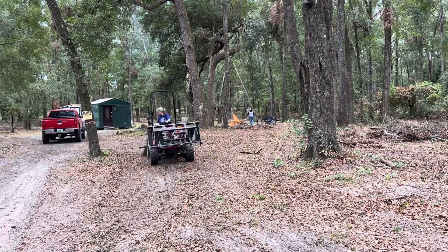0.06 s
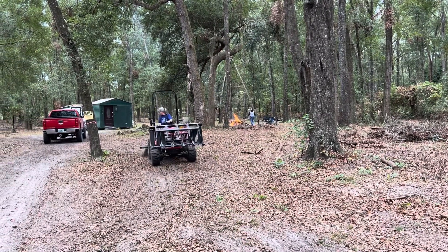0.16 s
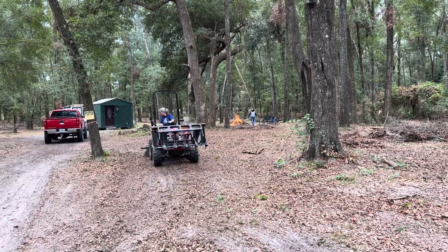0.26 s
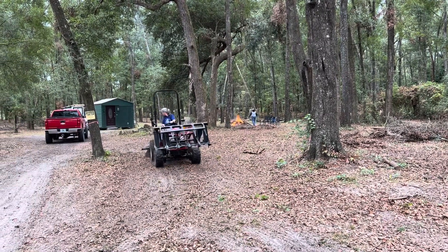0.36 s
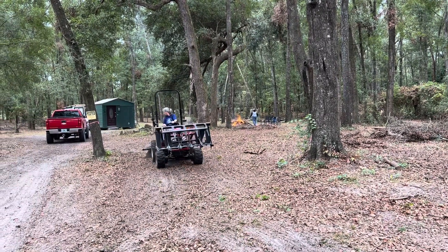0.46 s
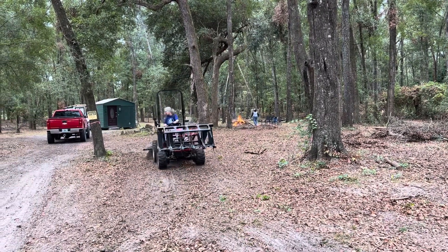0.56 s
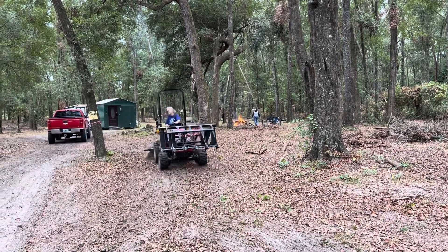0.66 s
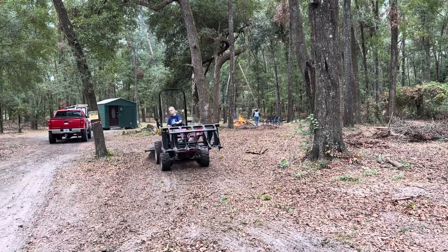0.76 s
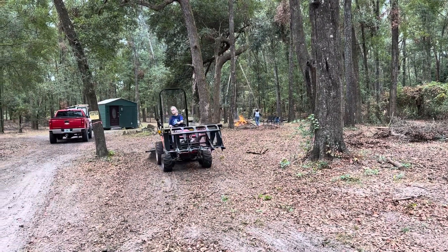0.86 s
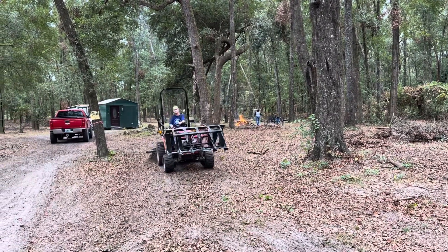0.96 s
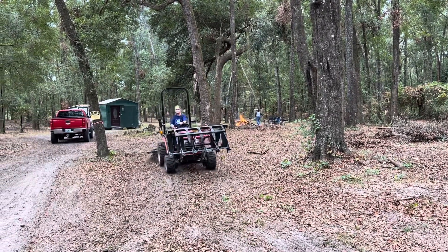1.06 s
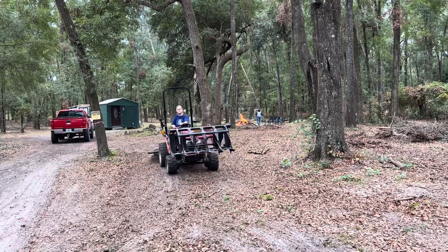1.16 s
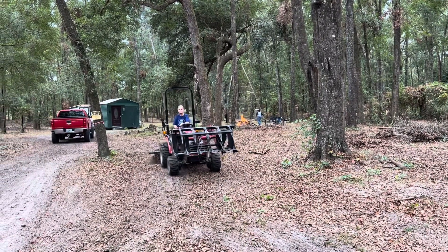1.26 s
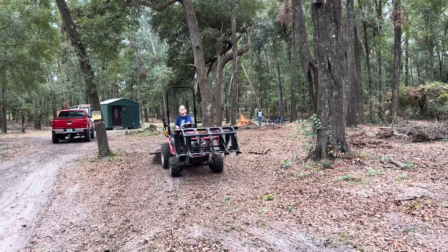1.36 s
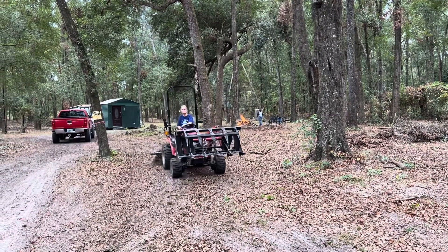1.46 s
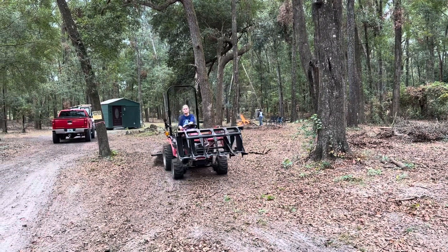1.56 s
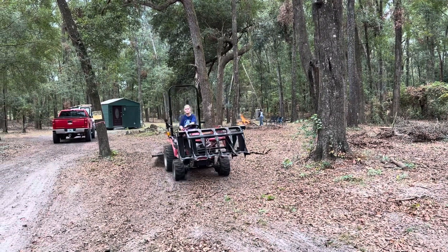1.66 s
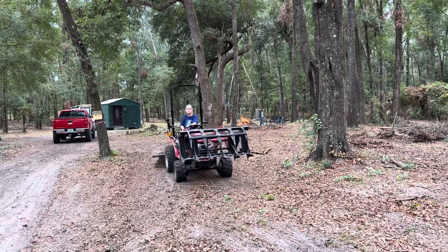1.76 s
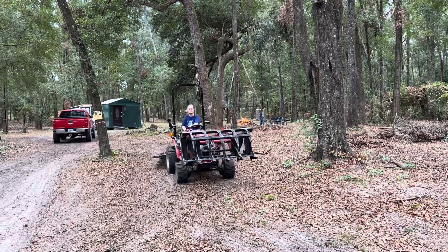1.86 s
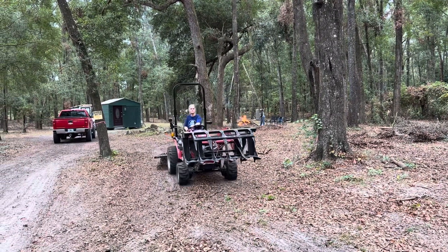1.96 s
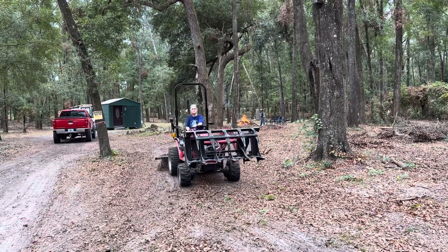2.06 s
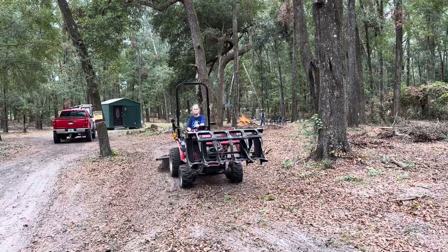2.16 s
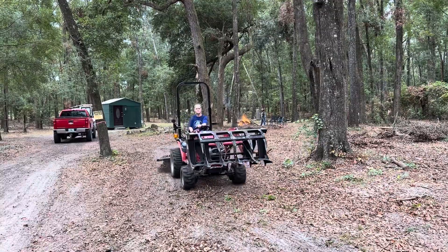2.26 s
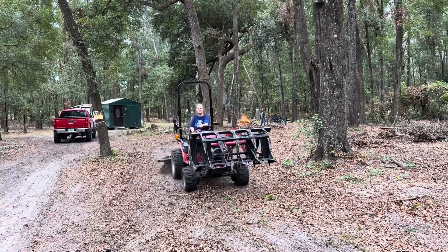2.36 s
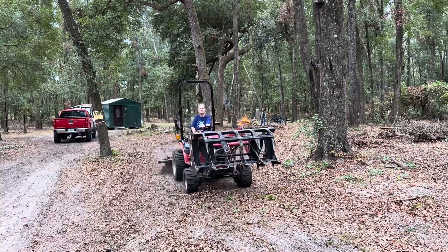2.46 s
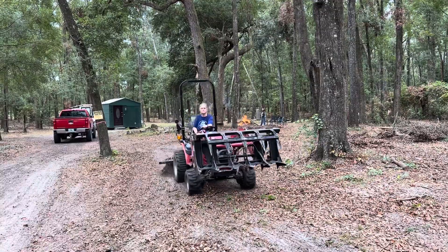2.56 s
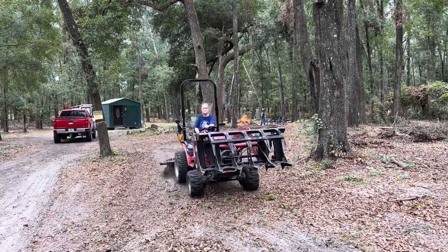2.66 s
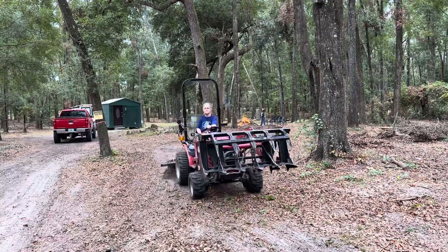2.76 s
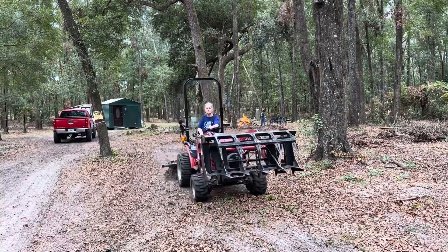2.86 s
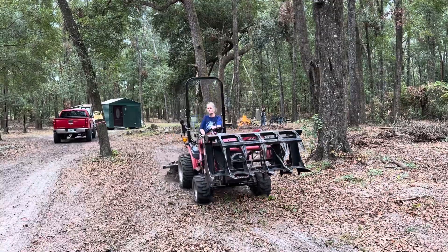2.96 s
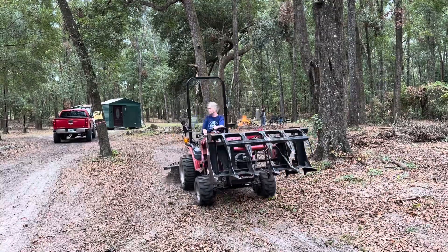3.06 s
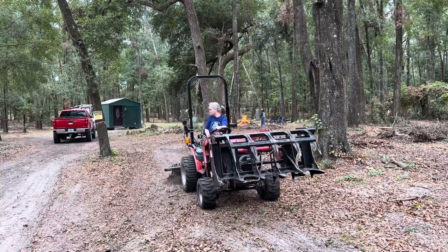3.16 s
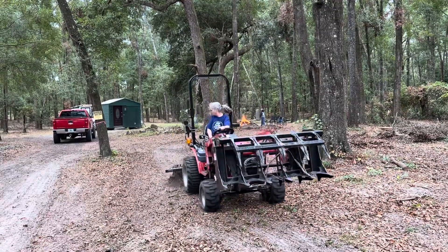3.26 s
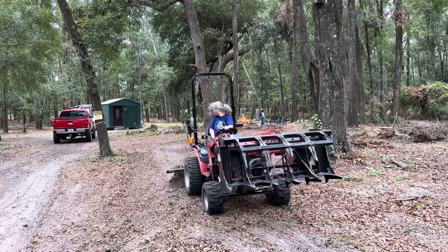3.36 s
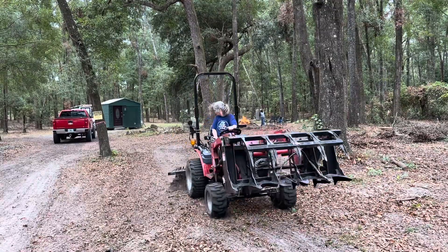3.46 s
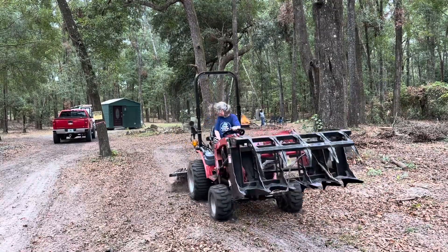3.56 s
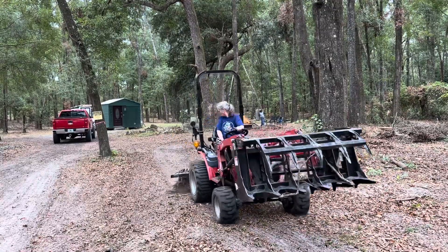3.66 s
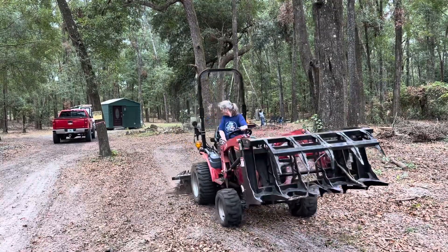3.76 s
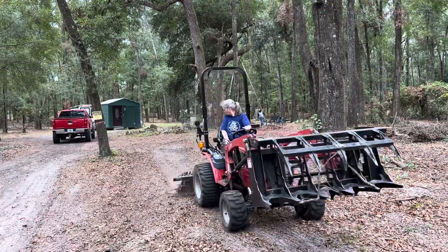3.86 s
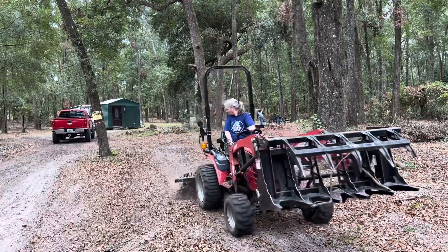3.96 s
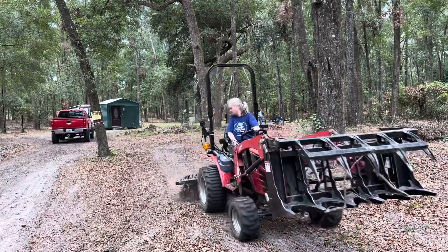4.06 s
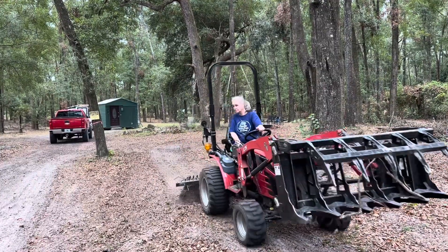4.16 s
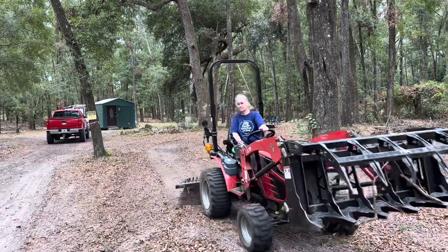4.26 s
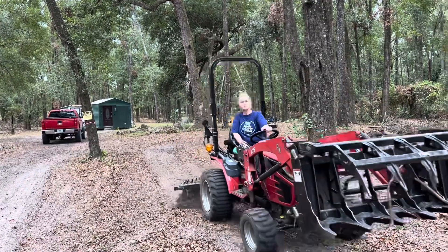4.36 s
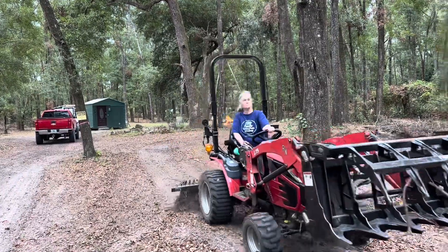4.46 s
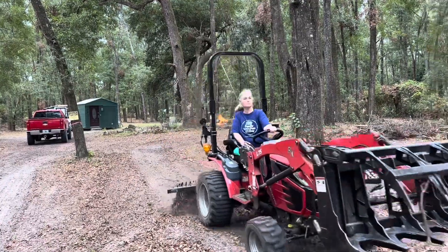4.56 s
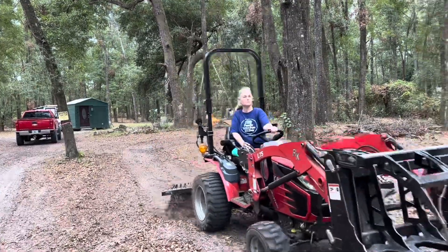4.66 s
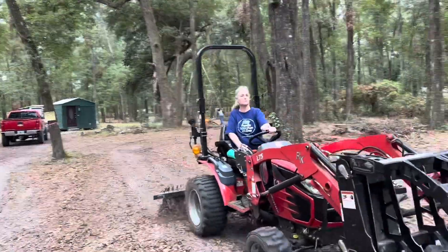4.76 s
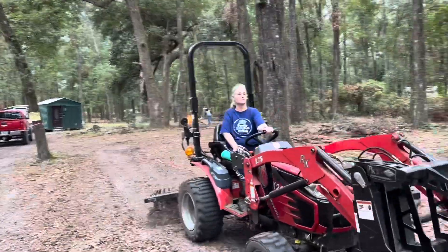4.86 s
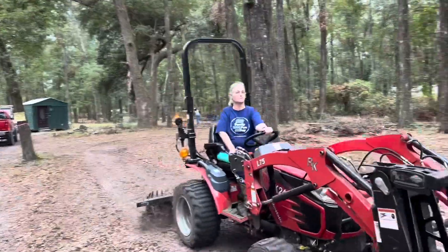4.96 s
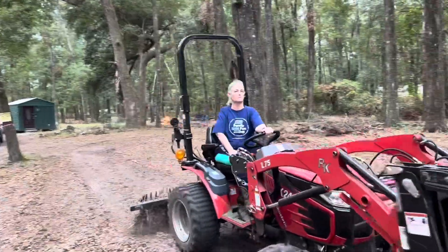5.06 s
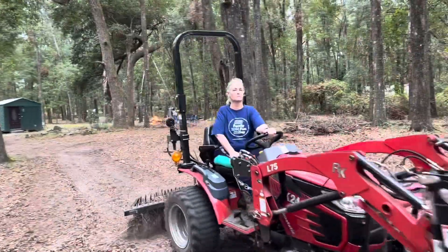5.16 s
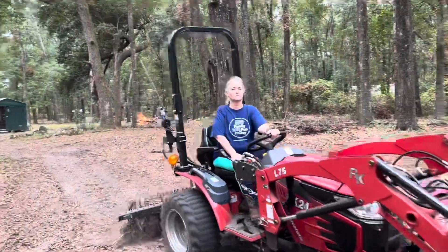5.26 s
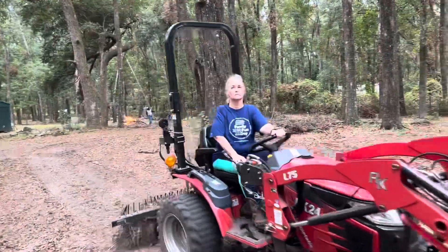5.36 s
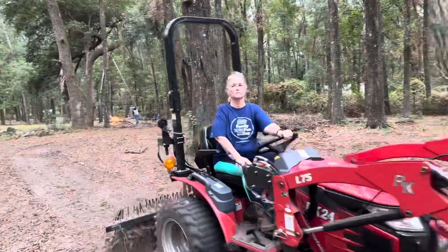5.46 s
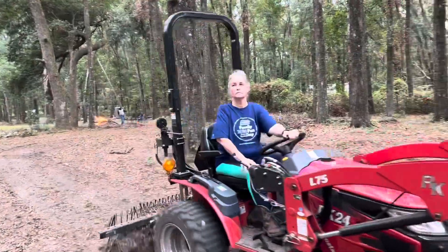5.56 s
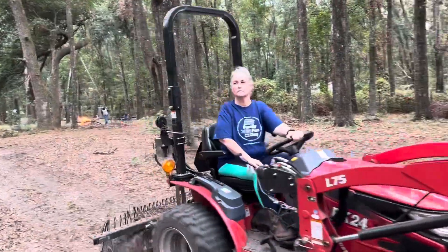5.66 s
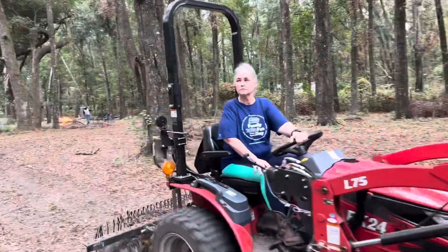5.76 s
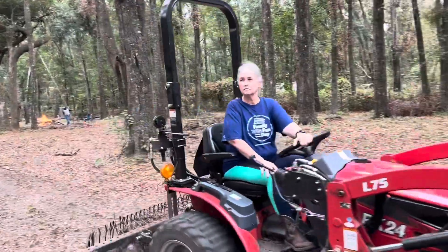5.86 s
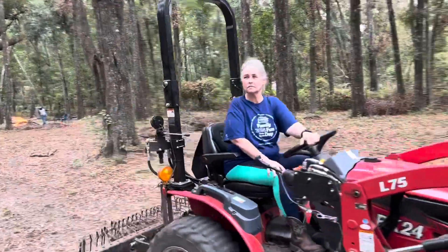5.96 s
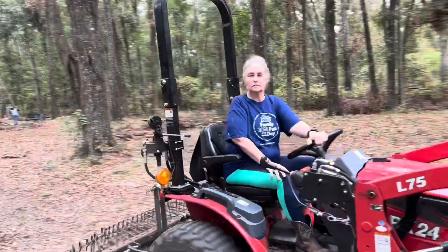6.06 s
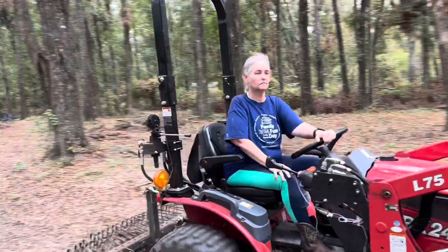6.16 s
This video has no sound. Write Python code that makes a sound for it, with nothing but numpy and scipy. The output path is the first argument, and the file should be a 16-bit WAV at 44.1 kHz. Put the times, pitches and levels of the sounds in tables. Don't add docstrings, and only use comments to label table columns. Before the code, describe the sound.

A small diesel tractor chugs steadily closer through a wooded clearing, its rake hissing through dry leaves while loose steel clanks ever more thickly.

```python
import sys
import numpy as np
from scipy import signal
from scipy.fft import rfft, irfft
from scipy.io import wavfile
from scipy.ndimage import uniform_filter1d, map_coordinates

SR = 44100
rng = np.random.default_rng(int(sys.argv[2]) if len(sys.argv) > 2 else 0)


def magnitude_from_level(level_db):
    exponent = np.asarray(level_db, float) / 20
    return 10 ** exponent


def int16_out(signal):
    q = np.round(np.clip(np.atleast_2d(signal).T, -1, 1) * 32767)
    wavfile.write(sys.argv[1], SR, q.astype(np.int16))


N = 273861


def unit(x):
    return x / np.sqrt(np.mean(x ** 2) + 1e-20)


def along(points, hz):
    f, v = np.transpose(points)
    return np.interp(np.log(hz + 1), np.log(f + 1), v)


def curves(rows):
    s, *cols = np.transpose(rows)
    return [np.interp(np.arange(N) / SR, s, c) for c in cols]


def wobble(rate):
    at = np.arange(0, N + 32, 32)
    knots = rng.standard_normal(int(N * rate / SR) + 4)
    return np.interp(np.arange(N), at, map_coordinates(knots, [at * rate / SR]))


def coloured(x, spectrum):
    size = 8192
    gain = magnitude_from_level(along(spectrum, np.fft.rfftfreq(size, 1 / SR)))
    cep = irfft(np.log(np.maximum(gain, 1e-6)))
    cep[1:size // 2] *= 2
    cep[size // 2 + 1:] = 0
    return signal.fftconvolve(x, irfft(np.exp(rfft(cep))))[:N]


def burst(train, spectrum):
    click = np.arange(N) == 0
    return coloured(train, spectrum) / np.linalg.norm(coloured(click, spectrum))


def bright(train):
    return burst(train, [(4000, -50), (5800, -16), (6650, -4), (7360, -13), (8100, 0), (9300, -16),
                         (10700, -16), (12200, -30), (15500, -38)])


def patchy(patchy_db, bins, frames):
    z = signal.stft(rng.standard_normal(N + 512), nperseg=512)[2]
    field = uniform_filter1d(rng.standard_normal(z.shape), bins, 0)
    field = uniform_filter1d(field, frames, 1)
    return signal.istft(z * magnitude_from_level(patchy_db * unit(field)), nperseg=512)[1][:N]


def tone(turns, multiple, db, waver_db, smear):
    phase = 2 * np.pi * (multiple * turns + rng.random()) + smear * wobble(12)
    return np.sqrt(2) * magnitude_from_level(db + waver_db * wobble(6)) * np.sin(phase)


def level(db, grows, lobes=()):
    closest_m, speed_m_s, abeam_s = 2.247, 1.86, 5.99
    t = np.linspace(0, N / SR, 1000)
    distance_m = np.hypot(closest_m, speed_m_s * (t - abeam_s))
    approach_db = -20 * np.log10(distance_m / closest_m)
    swells_db = sum(lobe_db * np.exp(-((t - s) / half) ** 2) for s, half, lobe_db in lobes)
    return curves(np.transpose([t, db + grows * approach_db + swells_db]))[0]


# time in seconds, share of the near side in view from 0 to 1.
TURN_TO_PHONE = [(0, 0), (3.2, 0.24), (4.3, 0.41), (5.1, 0.69), (6.21, 1)]


def passing(x, spectra):
    near = np.clip(curves(TURN_TO_PHONE)[0], 0, 1)
    far_x, near_x = (unit(coloured(x, s)) for s in spectra)
    return (1 - near) * far_x + near * near_x


# time in seconds, pump strokes in Hz.
ENGINE_SPEED = [(0, 485), (0.75, 485.4), (1.25, 482.6), (1.5, 483.2), (1.9, 482.7), (2.3, 483.8),
                (3.1, 483.6), (3.31, 480.6), (3.45, 483.3), (3.75, 482.1), (4.1, 482.8), (4.41, 484.9),
                (4.56, 481.8), (4.75, 485.4), (5.0, 485.5), (5.5, 483.9), (5.75, 482.6), (6.21, 482.8)]


def shaft():
    return np.cumsum(curves(ENGINE_SPEED)[0]) / (6 * SR)


def phone():
    t = np.arange(N) / SR
    whine = sum(np.sin(2 * np.pi * (240 * k * t + rng.random())) for k in range(49, 66))
    hiss_colour = [(2000, -30), (8000, -6), (12000, -1), (16000, -5)]
    hiss = unit(coloured(rng.standard_normal(N), hiss_colour))
    wind_colour = [(8, -30), (19, 0), (28, -5), (45, -30), (90, -120)]
    buffet = unit(coloured(rng.standard_normal(N), wind_colour))
    gust_db = level(*EXHAUST_TONES["first"]) - 21 + 4 * wobble(3)
    return magnitude_from_level(-103) * whine + magnitude_from_level(-85) * hiss + magnitude_from_level(gust_db) * buffet


# frequency in Hz, time to fade by 60 dB in seconds.
TREE_FADE = [(200, .5), (2000, 1), (10000, 0.2)]


def trees(x):
    hz, t, z = signal.stft(rng.standard_normal(SR // 2), SR, nperseg=256)
    fade = magnitude_from_level(-60 * t / along(TREE_FADE, hz)[:, None])
    tail = signal.istft(z * fade, SR, nperseg=256)[1]
    delayed = np.pad(x, (700, 0))
    return signal.fftconvolve(delayed, tail / np.linalg.norm(tail))[:N]


# frequency in Hz, level in dB per Hz.
LEAF_COLOURS = [
    [(1650, -44), (2800, -4.5), (3120, -7.5), (3280, 0), (3840, 3), (4550, -7.5), (5140, -5.5), (5560, -8), (6700, -10), (7360, -16), (8250, -9.5), (9380, -26), (10400, -15), (12100, -35.5), (15500, -29.5)],
    [(1650, -19), (2800, -5.5), (3070, -4.5), (3370, -0.5), (3750, 1), (4550, -16.5), (5070, -14.5), (6150, -16), (6650, -8.5), (7360, -18), (8190, -13), (9580, -20.5), (10800, -24.5), (12200, -34), (15500, -41)],
]
LEAF_LEVEL = -47, 1.09, [(1.1, 0.56, 1.3), (2.6, 0.27, -0.2), (3.65, 0.31, 0.8), (4.3, 0.12, -0.3),
              (5.4, 0.52, -1.4), (6.2, 0.062, 3)]


def leaves(fired):
    clump = magnitude_from_level(3 * wobble(13))
    crackle = (rng.random(N) < 1500 * clump / SR) * rng.standard_normal(N)
    cycle = fired / 3
    count = cycle.astype(int)
    strength = 0.6 * rng.random(count[-1] + 1)[count] ** 2
    jolt = strength * np.exp(-5.5 * (cycle - count))
    hiss = patchy(1.45, bins=12, frames=6) * magnitude_from_level(0.75 * wobble(6.1)) * (1 + jolt)
    rustle = unit(hiss) + 0.38 * unit(crackle)
    return magnitude_from_level(level(*LEAF_LEVEL) + 0.2) * passing(rustle, LEAF_COLOURS)


# time in seconds,
# peak in dB.
TWIG_SNAPS = [(1.2835, -49), (1.8003, -51), (2.2, -52), (3.464, -52), (3.4989, -46), (3.5803, -45),
              (3.7798, -47), (4.0657, -46), (4.2842, -46), (4.535, -46), (4.8135, -47), (4.9322, -42),
              (5.1662, -49), (5.3682, -41), (5.5253, -43), (5.5662, -44), (5.6027, -42), (5.6446, -46),
              (5.7176, -39), (5.7912, -44), (5.8287, -41), (5.9249, -46), (5.9544, -50), (6.127, -46),
              (6.1913, -42),
              (0.6833, -59), (0.7711, -54), (1.1994, -56), (2.0294, -59), (2.139, -51), (2.2298, -54),
               (2.4694, -55), (2.7716, -53), (3.2106, -53), (3.6294, -53), (3.7494, -50), (4.1155, -50),
               (4.4363, -47), (4.6594, -48)]


def twigs():
    out, t = np.zeros(N + SR), np.arange(SR // 8) / SR
    rise = 1 - np.exp(-t / 0.001)
    for s, db in TWIG_SNAPS:
        snap = magnitude_from_level(db - 5.0 - 60 * t / 0.046) * rise ** 2 * rng.standard_normal(len(t))
        out[round(s * SR):][:len(t)] += snap
    return bright(out)


# time in seconds, peak in dB, pitch of the tine in Hz, level of the tine in dB to the knock.
STEEL_KNOCKS = [(0.2798, -43.5, 2140, -5), (1.4207, -45, 2100, -2), (1.5249, -43.5, 2240, 5),
                (2.5082, -40, 2066, 2), (2.8559, -45, 2130, -1), (3.4635, -45, 2060, -2),
                (3.7813, -39, 2400, -5), (4.2842, -41, 2230, 3), (4.8988, -36, 2060, -6),
                (4.9322, -42, 2120, -3.5), (4.9691, -36, 2340, -4), (5.1936, -36, 2184, 2),
                (5.2475, -31, 2120, -8), (5.3233, -32, 2110, 1), (5.3657, -30.5, 2280, -2),
                (5.4256, -38, 2060, 5), (5.5189, -38, 2420, 3), (5.5573, -28, 2130, -3),
                (5.6451, -26.5, 2370, -7), (5.6805, -35, 2270, 3), (5.7249, -28.5, 2170, 7),
                (5.7583, -30, 2227, -1), (5.7937, -28, 2210, 2), (5.8316, -28.5, 2240, 1),
                (5.9244, -29.5, 2240, 1.5), (5.9564, -25.5, 2290, -9), (5.9918, -28, 2260, -3),
                (6.0821, -34, 2370, -16), (6.108, -29, 2060, -2), (6.1809, -32, 2080, 2)]
# start in seconds, number of blows (only whole blows sound),
# peak in dB, pitch in Hz.
TINE_BUZZES = [
    (1.21, 3.2, -56, 2344),
    (1.7994, 3.3, -48.5, 2145),
    (3.8194, 2.3, -53, 2270),
    (4.1994, 1.8, -47, 2225),
    (4.6633, 0.93, -49, 2100),
    (5.0575, 5, -38.5, 2200),
    (5.2894, 1.1, -44, 2350),
    (5.6047, 0.95, -43, 2260),
]


def clanks():
    frame, edge, tines = np.zeros((3, N + SR))
    t = np.arange(SR // 8) / SR
    rise = 1 - np.exp(-t / 0.001)
    blow_gap_s, buzz_tine_db, bright_db = 0.0365, 8, -14.5
    buzz = [(s + k * blow_gap_s, db, hz, buzz_tine_db)
            for s, blows, db, hz in TINE_BUZZES for k in range(int(blows))]
    for s, db, hz, tine_db in STEEL_KNOCKS + buzz:
        at = round(s * SR)
        noise = rng.standard_normal((3, len(t)))
        frame[at:][:len(t)] += magnitude_from_level(db - 8.5 - 60 * t / 0.055) * rise ** 2 * noise[0]
        edge[at:][:len(t)] += magnitude_from_level(db + bright_db - 5.5 - 60 * t / 0.058) * rise * noise[1]
        ring = np.sin(2 * np.pi * hz * t + 0.07 * noise[2].cumsum())
        tines[at:][:len(t)] += magnitude_from_level(db + tine_db - 5.5 - 60 * t / 0.09) * rise ** 2 * ring
    frame_colour = [(1500, -50), (2650, 2), (3070, -6), (3850, 0), (4550, -16), (5600, -21), (7000, -50)]
    tine_colour = [(1400, -57.0), (1900, 4.0), (2600, 9.5), (3400, -33.5)]
    return burst(frame, frame_colour) + bright(edge) + coloured(tines, tine_colour)


def rings(knocks, gain_db, attack_s, t60, rough):
    out, t = np.zeros(N + SR), np.arange(SR // 8) / SR
    for s, db, hz in knocks:
        phase = 2 * np.pi * hz * t + rough * rng.standard_normal(len(t)).cumsum()
        swell = magnitude_from_level(db + gain_db - 60 * t / t60) * (1 - np.exp(-t / attack_s)) ** 2
        out[round(s * SR):][:len(t)] += swell * np.sin(phase)
    return coloured(out, [(900, -40), (1450, 0), (4500, 0), (5600, -40)])


# time in seconds, peak in dB, pitch in Hz.
LOADER_PLATES = [(0.2798, -46, 3530), (0.6604, -51, 3920), (0.7342, -49, 3870), (1.2775, -47, 3680),
                 (1.4017, -50, 3790), (1.4212, -48, 3870), (1.5254, -45, 3750), (2.5077, -44, 3870),
                 (2.8559, -49, 3840), (3.4648, -48, 3800), (3.6311, -53, 3860), (3.7509, -44, 3750),
                 (4.0502, -46, 3380), (4.0971, -52, 3870), (4.2862, -46, 3840), (4.5206, -46, 3880),
                 (4.5361, -45, 4340), (4.7651, -46, 3710), (4.8184, -48, 3520), (4.8818, -45, 3450),
                 (4.8988, -42, 3600), (4.9771, -44, 3710), (5.0529, -46, 3480), (5.0749, -44, 3630),
                 (5.0948, -50, 3500), (5.1302, -44, 3430), (5.1672, -43, 3670), (5.1941, -44, 3500),
                 (5.2121, -39, 3750), (5.2475, -42, 3880), (5.29, -42, 3390), (5.3378, -43, 3300),
                 (5.3657, -41, 3330), (5.4879, -42, 3500), (5.5194, -40, 3390), (5.557, -36, 3990),
                 (5.6126, -41, 3540), (5.6451, -37, 3310), (5.681, -40, 3590), (5.7249, -38, 3340),
                 (5.7593, -36, 3530), (5.7952, -36, 3500), (5.8316, -34, 3280), (5.924, -34, 3830),
                 (5.9564, -33, 3480), (5.9926, -33, 3310), (6.0492, -41, 3630), (6.0676, -37, 3390),
                 (6.107, -35, 3880), (6.1394, -40, 3380), (6.1634, -35, 3630), (6.1814, -31, 3340)]
# time in seconds, peak in dB, pitch in Hz.
RAKE_BARS = [(3.9962, -46, 2670), (4.8912, -48, 2850), (5.1047, -34, 2590), (5.1296, -40, 2790),
             (5.196, -41, 2680), (5.2523, -36, 2540), (5.3012, -42, 2730), (5.3332, -32, 2690),
             (5.3656, -33, 2620), (5.404, -42, 2650), (5.4993, -34, 2580), (5.525, -33, 2690),
             (5.5582, -38, 2830), (5.6455, -31, 2680), (5.7225, -39, 2660), (5.7592, -44, 2870),
             (5.8285, -44, 2980), (5.9323, -40, 2570), (5.9827, -45, 2730), (6.1064, -43, 2520),
             (6.1463, -45, 2900), (6.1827, -37, 2850)]
# time in seconds, peak in dB, pitch in Hz.
TINE_TOUCHES = [(0.2394, -43, 2360), (1.0934, -42, 2290), (1.1952, -44, 2380), (1.2481, -43, 2340),
                (1.2925, -40.5, 2360), (1.5214, -39, 2330), (1.6033, -42, 2180), (1.8078, -39, 2110),
                (1.8632, -37, 2156), (1.9609, -38, 2130), (2.148, -42, 2180), (2.1969, -40, 2190),
                (2.5132, -38, 2060), (2.7023, -37, 2090), (3.5034, -42, 2050), (3.7883, -39, 2420),
                (3.8452, -37, 2335), (3.936, -40, 2350), (3.9809, -39, 2330), (4.0253, -32, 2220),
                (4.0751, -35, 2270), (4.118, -37, 2170), (4.1854, -34, 2220), (4.2088, -37, 2215),
                (4.2423, -39, 2220), (4.2812, -34, 2266), (4.4902, -32, 2060), (4.5371, -40, 2280),
                (4.6453, -42, 2060), (4.6773, -43, 2110), (4.804, -36, 2420), (4.8708, -39, 2230)]
# time in seconds, peak in dB, pitch in Hz.
BLOCK_RINGS = [(0.0444, -36, 1670), (2.363, -36, 1667), (2.5107, -41, 1660), (3.0657, -32, 1650),
               (3.2899, -38, 1720), (3.4545, -36, 1560), (3.5558, -28, 1664), (3.902, -31, 1650),
               (3.9524, -31, 1680), (4.2004, -35, 1770), (4.259, -27, 1660), (4.335, -30, 1680),
               (4.3809, -30, 1576), (4.4528, -33, 1700), (4.5795, -32, 1593), (4.6155, -28, 1680),
               (4.6668, -28, 1610), (4.7072, -29, 1660), (4.9646, -30, 1680), (5.123, -35, 1630),
               (5.222, -29, 1520), (5.26, -29, 1737), (5.3378, -27, 1705), (5.3682, -38, 1630),
               (5.44, -30, 1690), (5.5222, -27, 1670), (5.6096, -27, 1664), (5.664, -30, 1620),
               (5.7284, -24, 1820), (5.7778, -28, 1740), (5.8102, -27, 1634), (5.8408, -28, 1620),
               (5.887, -32, 1780), (5.9399, -29, 1750), (5.9698, -28, 1607), (6.0197, -27, 1730),
               (6.0581, -24, 1550), (6.102, -22, 1545), (6.1398, -30, 1677), (6.1769, -31, 1530)]


def rattle():
    plates = rings(LOADER_PLATES, gain_db=2.5, attack_s=0.0039, t60=0.057, rough=0.15)
    bars = rings(RAKE_BARS, gain_db=4, attack_s=0.0036, t60=0.057, rough=0.13)
    tines = rings(TINE_TOUCHES, gain_db=1.5, attack_s=0.0044, t60=0.092, rough=0.068)
    block_notes = rings(BLOCK_RINGS, gain_db=0.0, attack_s=0.009, t60=0.12, rough=0.05)
    return plates + bars + tines + block_notes


# time in seconds, pitch in Hz, level in dB to the fan air.
INTAKE_HOOT = [(0, 617.6, -14), (1.5, 614.5, -9.5), (2.2, 622, -19), (2.7, 625, -8.5), (3.8, 634.7, -10),
               (4.3, 634.6, -2.5), (4.55, 626, -8), (4.72, 650.6, 0.5), (4.85, 652, -17), (5.1, 660, -7),
               (5.6, 685, -9), (5.75, 715, -12), (6.02, 715, -2.5), (6.21, 701, -18)]


def intake():
    hz, db = curves(INTAKE_HOOT)
    turns = 2 * np.pi * np.cumsum(hz) / SR
    hoot = wobble(34) * np.sin(turns) + wobble(34) * np.cos(turns)
    return magnitude_from_level(level(*AIR_LEVEL) + db) * unit(hoot)


FAN_TONES = {"blade": (-46, .7, [(.35, 0.23, -5), (.9, 0.32, 2.5), (2, .1, 2.5), (2.7, 0.14, 2),
             (3.8, 0.25, -21), (4.48, 0.33, 5), (5.05, 0.41, 12.5), (5.62, 0.36, 10)]),
             "second": (-47.5, 0.74, [(1.8, .12, 2.5), (2, 0.12, -4), (3.05, 0.18, 2), (3.75, .25, 2),
             (5, .1, -6), (6.17, .1, 3)]), "alternator": (-56.5, 1.24, [(.3, .2, -9), (.8, .12, 11),
             (2.8, 0.1, 8), (3.9, 0.16, 12), (4.9, 0.24, 11), (5.2, 0.12, 14), (6, .12, 9)])}
# frequency in Hz, level in dB per Hz.
AIR_COLOURS = [
    [(15, -42), (40, -34), (118, -15.5), (215, -3.5), (315, 0), (468, -7), (560, -5), (640, -4), (720, -4.5), (1100, -4), (1430, -35), (2420, -120)],
    [(15, -52), (40, -30), (118, -21.5), (209, -19.5), (320, -3.5), (430, 2), (560, 0), (700, -1.5), (780, -5.5), (1100, -9), (1430, -30), (2420, -120)],
]
AIR_LEVEL = -36.5, 0.93, [(.6, 0.46, -0.3), (3.55, .15, 2.5), (4.85, 0.33, 1), (6.1, 0.2, -0.7)]


def fan(fired):
    first_db, second_db, alternator_db = (level(*row) for row in FAN_TONES.values())
    blades, poles = 5.115 * fired, 16.39 * fired
    tones = tone(blades, 1, first_db, waver_db=0.46, smear=0.13)
    tones += tone(blades, 2, second_db, waver_db=0.71, smear=0.1)
    tones += tone(blades, 3, second_db - 9.5, waver_db=2.5, smear=0.5)
    tones += tone(blades, 4, second_db - 9.0, waver_db=2.7, smear=0.84)
    tones += tone(poles, 1, alternator_db, waver_db=1.2, smear=0.5)
    air = passing(patchy(0.79, bins=3, frames=12), AIR_COLOURS)
    return tones + magnitude_from_level(level(*AIR_LEVEL) - 1.0 + 1.04 * wobble(9)) * air


PUMP_TONES = {"third": (-44, 1.05, [(0, .3, 4.5), (1, .35, -8), (2, 0.18, -2), (3.2, .2, -3),
              (4.15, .45, 4), (4.75, 0.093, -19), (5.2, 0.2, -10), (5.77, .04, 5), (6.19, .085, 14)]),
              "fourth": (-46.5, 0.91, [(2.25, 0.14, 3), (3, .4, -1), (4.85, .3, 6), (5.4, .25, -9.5),
              (6.1, 0.21, 7.5)]), "fifth": (-51, 1.68, [(.5, .2, -6), (1.7, 0.34, -1), (2.5, 0.11, 3),
              (4.35, 0.27, 5)]), "ninth": (-71, .7, [(1.25, .12, 4), (3.31, .05, 10), (3.98, .1, 7),
              (4.12, .05, 7), (4.37, .1, 6), (4.56, .03, 7), (4.9, .2, -4)]),
              "tenth": (-73, .7, [(3.22, .07, 8), (3.6, .07, 10), (3.95, .08, 4), (4.4, .2, 5),
              (5.45, .25, 4)]), "second": (-57, 0.99, [(2.4, .2, 3), (4.95, .08, 6), (5.22, .1, 9),
              (6.1, .12, 6)]), "sixth": (-67, 1.1, [(.25, .05, 11), (6.15, .09, 13)]),
              "eleventh": (-74.5, .7, [(3.28, .08, 11), (3.54, .1, 12), (3.83, .15, 10), (4.2, .04, 7)])}


def pump(fired):
    db = {name: level(*row) for name, row in PUMP_TONES.items()}
    strokes = 6 * fired
    levels = {2: db["second"], 3: db["third"] - 1, 4: db["fourth"] - 1, 5: db["fifth"] + 1,
              6: db["sixth"], 7: db["ninth"] - 2, 8: db["tenth"] + 3, 9: db["ninth"] + 1,
              10: db["tenth"], 11: db["eleventh"]}
    return sum(tone(strokes, k, tone_db + 1.6 * wobble(25), waver_db=0.6, smear=0.45)
               for k, tone_db in levels.items())


# frequency in Hz, level in dB per Hz.
BLOCK_COLOURS = [
    [(470, -31.5), (800, -6.5), (996, -9.5), (1230, -2), (1500, -2), (1670, 0.5), (1800, -2), (1950, -3), (2400, -9.5), (3040, -28.5), (4290, -58), (7260, -120)],
    [(470, -29), (800, -6.5), (950, -11), (1230, -3), (1410, -1), (1680, 2), (2040, -1.5), (2220, -7), (2500, -12.5), (2680, -14), (3070, -22.5), (4290, -30), (7260, -120)],
]
BLOCK_LEVEL = -32, 0.9932, [(1.2, 0.54, 0.86), (3.3, 0.071, -1.2), (4.55, 0.15, 0.67), (5.65, .15, 1.1)]


def block(fired):
    count = fired.astype(int)
    size = magnitude_from_level(7.3 * rng.standard_normal(count[-1] + 1))[count]
    puff = 5.9 + size * np.exp(-3.5 * (fired - count))
    roar = passing(unit(puff * patchy(1.1, bins=3, frames=14)), BLOCK_COLOURS)
    return magnitude_from_level(level(*BLOCK_LEVEL) - 1.7 + 0.28 * wobble(7)) * roar


# multiple of the whole engine cycle, level in dB to the firing tones.
UNEVEN_CYLINDERS = [(2, -26), (4, -20.5), (5, -33), (7, -10), (8, -14.5), (9, -9.5), (10, -6), (11, -10.5),
                    (13, -11.5), (14, -10.5), (15, -10.5), (17, -14.5), (18, -18), (19, -15.5), (21, -13),
                    (23, -12.5), (26, -10), (27, -10.5), (29, -16), (53, -7), (58, -14), (62, -12),
                    (63, -7)]
EXHAUST_TONES = {"first": (-45, 0.89, [(2.6, .3, 1), (4, .25, 1.8), (5, 0.28, 1.5), (6.2, 0.39, -2.3)]),
                 "second": (-46, 0.58, [(0, .3, -3), (1.75, 0.12, 2.1), (2.8, 0.27, -1.3), (3.55, 0.19, 2),
                 (4.45, .25, 1.5)]), "fourth": (-45, 0.75, [(1.75, 0.14, 3), (5.1, 0.62, -7),
                 (5.5, 0.15, -8), (6, 0.33, -6)]), "gear": (-44, 1.84, [(0, .15, -12), (4.5, 0.18, 4),
                 (6.2, 0.6, -17)])}


def exhaust(fired):
    first_db, second_db, fourth_db, gear_db = (level(*row) for row in EXHAUST_TONES.values())
    clean = tone(fired, 1, first_db, waver_db=0.18, smear=0.03)
    clean += tone(fired, 2, second_db, waver_db=0.55, smear=0.089)
    clean += tone(fired, 4, fourth_db, waver_db=0.66, smear=0.15)
    cycle = fired / 3
    middle_db = (first_db + second_db) / 2
    uneven = sum(tone(cycle, int(k), middle_db + db, waver_db=2.7, smear=0.18)
                 for k, db in UNEVEN_CYLINDERS)
    gear = tone(cycle, 22, gear_db, waver_db=1.0, smear=0.36)
    return clean + uneven + gear


def scene():
    fired = shaft()
    knocks = twigs() + clanks() + rattle()
    engine = intake() + fan(fired) + pump(fired) + block(fired) + exhaust(fired)
    return (engine + leaves(fired) + knocks + magnitude_from_level(-11.0) * trees(knocks))[None]


def roll_off(x):
    return signal.sosfilt(signal.butter(12, 15630, fs=SR, output="sos"), x)


def record(dry):
    return roll_off(dry + phone())


dry = scene()
out = record(dry)
int16_out(out)
```